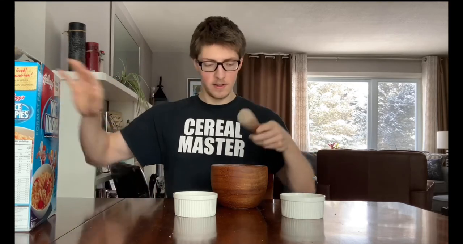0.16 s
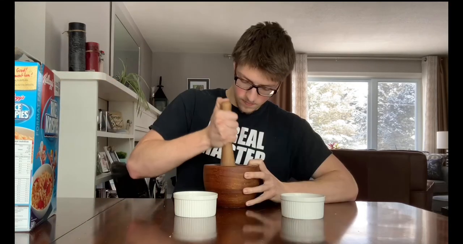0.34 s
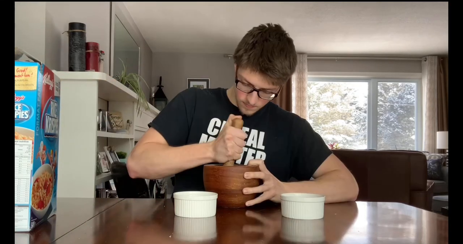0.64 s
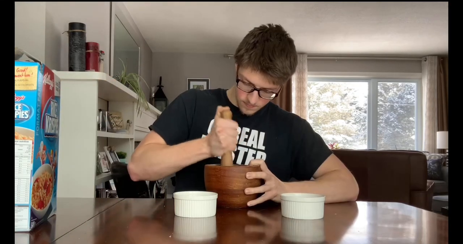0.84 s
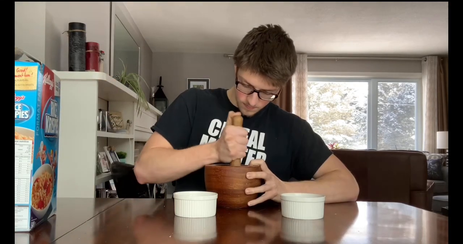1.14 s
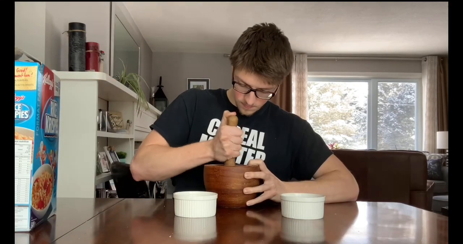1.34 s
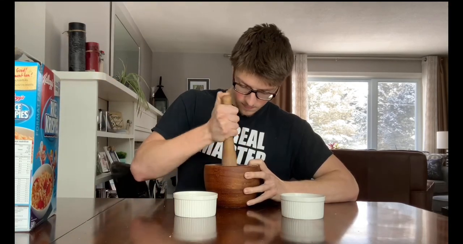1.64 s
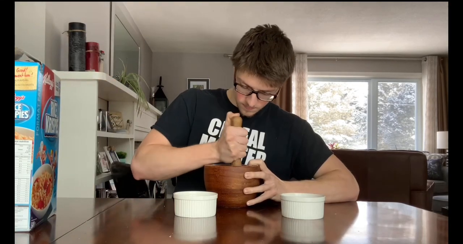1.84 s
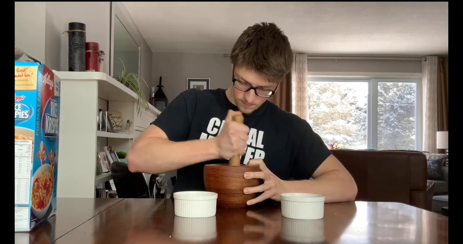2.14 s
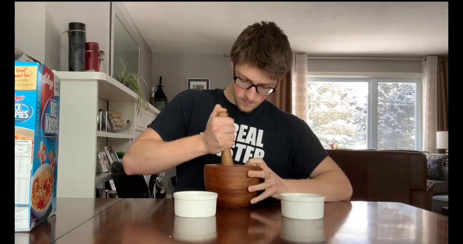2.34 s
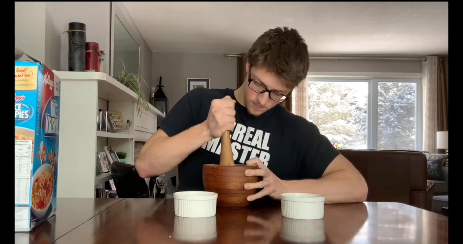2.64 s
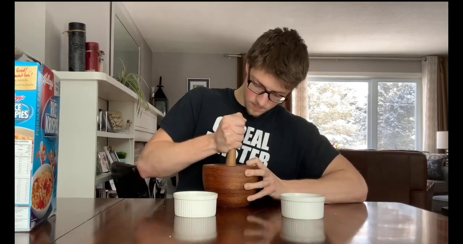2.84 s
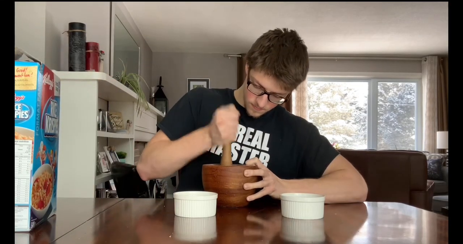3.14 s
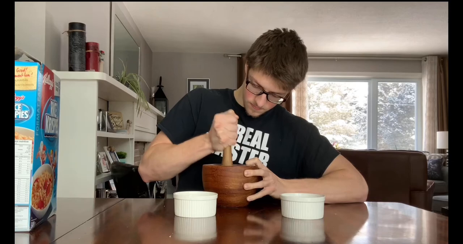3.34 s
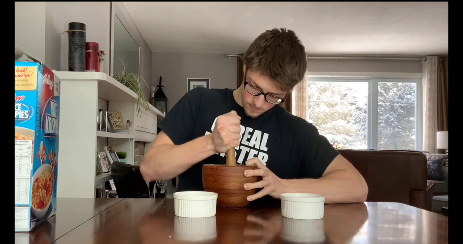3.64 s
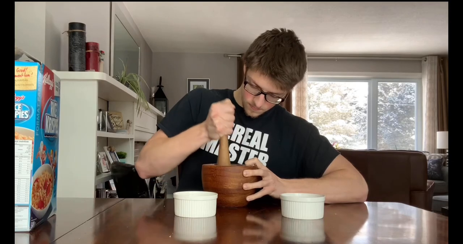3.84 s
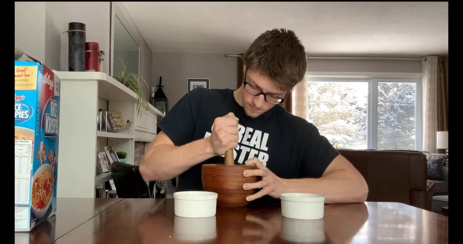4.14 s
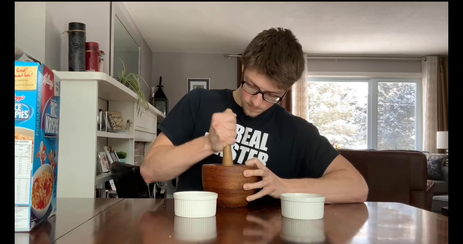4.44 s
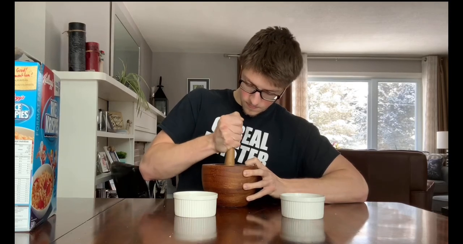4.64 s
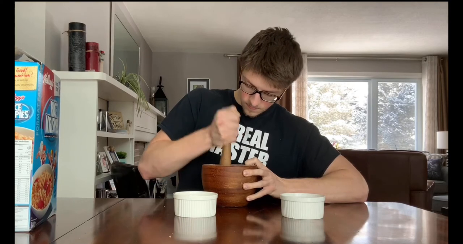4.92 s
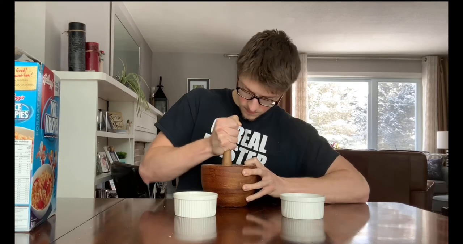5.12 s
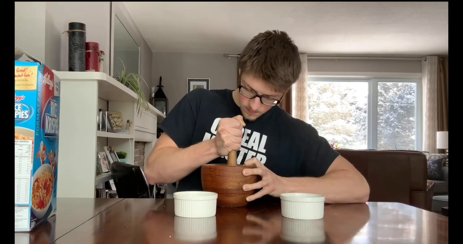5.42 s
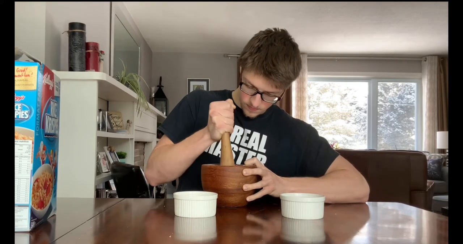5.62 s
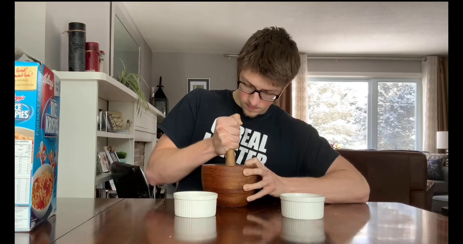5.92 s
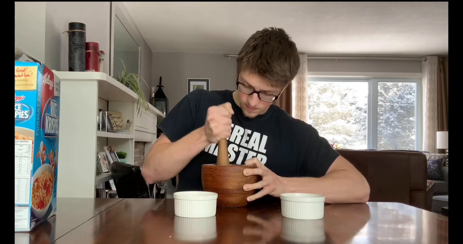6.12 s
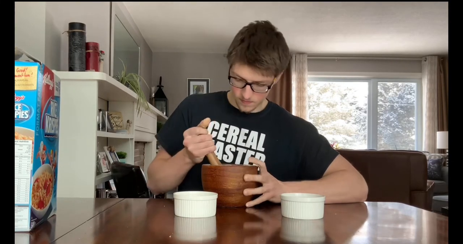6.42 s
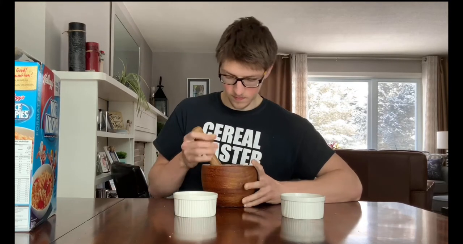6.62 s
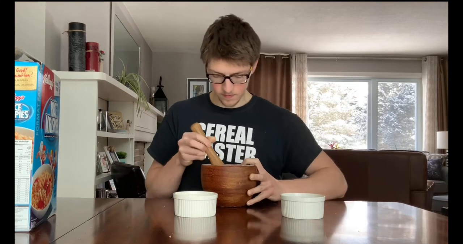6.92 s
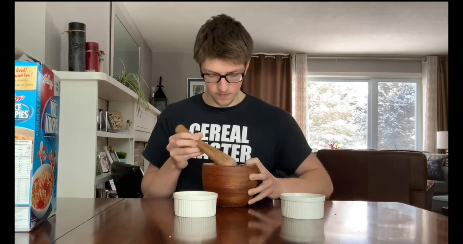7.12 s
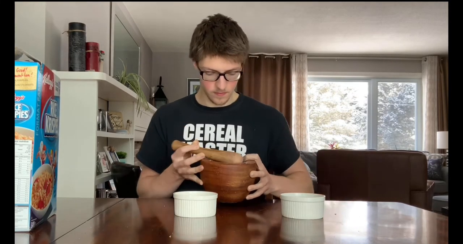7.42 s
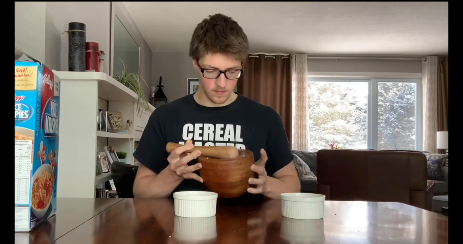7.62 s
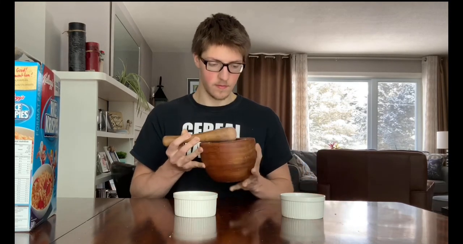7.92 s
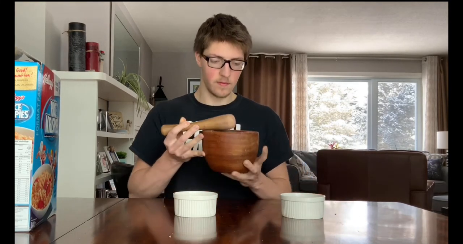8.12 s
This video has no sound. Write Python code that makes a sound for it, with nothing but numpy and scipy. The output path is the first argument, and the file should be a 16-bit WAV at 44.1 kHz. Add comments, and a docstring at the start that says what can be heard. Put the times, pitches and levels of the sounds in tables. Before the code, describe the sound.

A wooden pestle crunches dry cereal flakes in a wooden bowl in uneven pushes, then a few soft knocks as it is lifted.

```python
"""Grinding dry flakes in a wooden mortar

A wooden pestle grinds cereal flakes on a dining table in quick, uneven pushes and then is handled at rest.
Brittle fracture is shaped noise, denser under more force; stick-slip friction rumbles in bowl and table.
Knocks, cracks and light slides excite damped modes of the wood, in a living room with short echoes.
Low ventilation is coloured noise with a wavering hum; two spaced microphone ports hear it all.
"""
import sys
import numpy as np
from scipy import signal
from scipy.fft import rfft, irfft, next_fast_len
from scipy.io import wavfile

SR = 44100
rng = np.random.default_rng(int(sys.argv[2]) if len(sys.argv) > 2 else 0)


def inscribe(sig):
    """Save sig as 16-bit PCM at rate SR to the path in sys.argv[1].

    A 1-D sig is mono; a 2-D sig holds one channel per row.
    Samples are clipped to [-1, 1] before scaling.
    """
    pcm = np.round(np.clip(np.atleast_2d(sig).T, -1, 1) * 32767)
    wavfile.write(sys.argv[1], SR, pcm.astype(np.int16))


N = 364707
SIZE = next_fast_len(N + SR // 4, real=True)
TIME = np.arange(N) / SR  # s
FREQS = np.arange(SIZE // 2 + 1) * SR / SIZE  # Hz

TOP_HZ = 15650  # upper limit of the sound
SWEEP_ATTACK_S, SWEEP_SETTLE_DB_PER_S = 0.007, 288  # onset and end of sweeping and sliding
LEFT_RIGHT = np.array([[1], [-1]])

# modes of mortar and pestle: (frequency [Hz], relative level [dB], decay time to -60 dB [s])
WOOD_MODES = [(465, -11, 0.067), (561, -7.5, 0.085), (677, 2, 0.015), (884, 7, 0.0045), (1114, 5.5, 0.0041),
              (1420, -2, 0.018), (1520, -7, 0.04), (1703, -17, 0.049), (1900, -10.5, 0.015),
              (3514, 19, 0.046), (3790, 3.5, 0.041), (4490, 16, 0.025), (6160, 5, 0.015),
              (624, -20.5, 0.24)]
# low thrum of the loaded table: (frequency [Hz], relative level [dB])
THRUM_SPECTRUM = [(100, -2.5), (195, 0.5), (245, 9.5), (400, 5.5), (600, -12), (1200, -55), (3000, -65)]


def undb(db):
    """Level and amplitude are logarithmically related: decibels to gain, floored at -300 dB."""
    return np.exp(np.maximum(db, -300) * np.log(10) / 20)


def unit(x):
    """Normalization by the root mean square: scale to rms 1."""
    return x / np.sqrt(np.mean(x ** 2))


def across(points):
    """Interpolation on a logarithmic pitch axis: a (Hz, value) table over all frequencies."""
    hz, value = np.transpose(points)
    return np.interp(np.log(FREQS + 1), np.log(hz), value)


def shape(x, response):
    """Linear filtering: multiply the spectrum by a frequency response."""
    return irfft(rfft(x, SIZE) * response, SIZE)[..., :N]


def colour(x, points):
    """Spectral shaping that keeps the power of a white input."""
    return shape(x, unit(undb(across(points))))


def through(x, response):
    """Superposition: convolve with an impulse response."""
    return signal.oaconvolve(x, response)[:N]


def decay(t, t60):
    """Exponential damping: amplitude falls by 60 dB in t60 seconds."""
    return np.exp(-np.log(1000) * t / t60)


def ringing(modes):
    """Modal superposition: damped modes of alternating sign form an impulse response of energy 1."""
    t = TIME[:SR // 3]
    ring = 0
    for k, (hz, db, t60) in enumerate(modes):
        ring = ring + (-1) ** k * undb(db) * np.sin(2 * np.pi * hz * t) * decay(t, t60)
    return ring / np.sqrt(np.sum(ring ** 2))


def walk(rate):
    """Random modulation: normal draws, rate per second, joined by straight lines; spread near 1."""
    points = rng.standard_normal(N // 16)
    return np.interp(TIME * rate, np.arange(len(points)), points)


def fractures(per_second, spread_db, clump_db, clump_rate):
    """Random impulse process: tiny clicks of unequal size, swelling in clumps; rms 1."""
    chance = np.clip(per_second / SR, 0, 1)
    size = undb(spread_db * np.minimum(rng.exponential(size=N), 4))
    clicks = (rng.random(N) < chance) * size * rng.choice([-1, 1], N)
    even = clicks / np.sqrt(chance)  # density leaves the power unchanged
    return unit(even * undb(clump_db * walk(clump_rate)))


def since(moment):
    """Causality: seconds gone by since a moment, 0 before it."""
    return np.maximum(TIME - moment, 0)


def together(*gains):
    """Incoherent addition: the powers of unrelated sounds add."""
    return np.sqrt(sum(gain ** 2 for gain in gains))


def shifting_ring(x, modes, patchy_db, bend, rate):
    """Modal resonance with each pitch and level wandering alone; near the power of a white input."""
    out, energy = 0, 0
    for hz, db, t60 in modes:
        fall = np.log(1000) / (t60 * SR)
        swing = np.exp(2j * np.pi * np.cumsum(hz * (1 + bend * walk(rate))) / SR)
        envelope = signal.lfilter([1], [1, -np.exp(-fall)], x * np.conj(swing))
        ring = np.imag(swing * envelope)
        out = out + ring * undb(db + patchy_db * walk(rate))
        energy = energy + undb(db) ** 2 / (2 * 2 * fall)
    return out / np.sqrt(energy)


def table_tones(x, t60):
    """Modal resonance: the long, low ring of the table and the room around it."""
    # standing tones: (frequency [Hz], relative level [dB])
    standing_tones = [(230, -5), (280, 1), (350, 0), (469, 0), (539, -3), (594, -1), (697, -3), (736, 0),
                      (795, -3), (856, -2), (998, -7), (1050, -7)]
    return through(x, ringing([(hz, db, t60) for hz, db in standing_tones]))


def background():
    """Broadband flow noise with a frequency-modulated hum: ventilation over the hush of the house."""
    # ventilation: (frequency [Hz], relative level [dB])
    drone_spectrum = [(20, -33), (30, -1), (45, -16.5), (62, -12), (88, 1.5), (108, -4.5), (130, -1),
                      (160, -11), (200, -16.5), (300, -34.5), (600, -54.5)]
    # hush of the house: (frequency [Hz], relative level [dB])
    hush_spectrum = [(25, -51), (86, 7), (136, -6), (253, -28.5), (281, -21), (399, -22.5), (445, -20),
                     (567, -32), (970, -34), (1530, -36.5), (1800, -47.5), (3930, -66), (5800, -58),
                     (9550, -48), (15500, -79)]
    drone = undb(-42.5) * colour(rng.standard_normal(N), drone_spectrum)
    hum_hz = 93 + 2.69 * walk(7)
    hum = undb(-56.5 + 6.0 * walk(17.0)) * np.sin(2 * np.pi * np.cumsum(hum_hz) / SR)
    # side against middle: (frequency [Hz], level [dB])
    spread = undb(across([(80, -21), (200, -8.0), (500, -3.5), (3000, 2.5), (8000, -21)]))
    mid, side = colour(rng.standard_normal((2, N)), hush_spectrum)
    above_drone = FREQS ** 2 / (FREQS ** 2 + 130 ** 2)
    hush = shape(mid, above_drone) + shape(side, spread * above_drone) * LEFT_RIGHT
    return drone + hum + undb(-39) * hush


def sweeping():
    """Granular flow: strength of rustle and grit as loose flakes move, swell or thin, and settle."""
    # flakes swept between pushes or sliding as the bowl is handled: (start [s], length [s],
    # relative level reached [dB], swell on the way [dB], grit relative to rustle [dB])
    sweep_events = [(.005, 0.061, -68.5, -1.5, 7), (0.1, 0.21, -56, -7.5, -10),
                    (0.587, 0.15, -42.5, 6.5, -12), (0.804, 0.081, -61, 7, -18),
                    (1.374, 0.12, -40, 7, -12.5), (1.997, 0.12, -50.5, 8, -12),
                    (2.383, 0.031, -43, 0, -11.5), (2.449, 0.076, -39, 23.5, -16),
                    (2.803, 0.13, -52, 0, -30), (3.17, 0.18, -56, -9.5, -22), (3.591, 0.1, -35.5, 24, -11),
                    (3.713, 0.07, -42, 4, -14.5), (4.019, 0.095, -43.5, 1.5, -16),
                    (4.15, 0.099, -45, 9, -22.5), (4.521, 0.19, -58, 0, -26.5), (5.32, 0.13, -60, -2, -24),
                    (5.475, 0.096, -50.5, 7.5, -1), (6.143, 0.069, -47.5, 23, -11),
                    (6.28, 0.39, -74, 4, -1), (6.644, 0.094, -61.5, 7, -7), (6.998, 0.25, -78.5, 2, 5.5),
                    (7.649, 0.054, -56.5, 5, -20)]
    loose, gritty = np.zeros((2, N))
    for start, length, db, swell_db, grit_db in sweep_events:
        to_go = 1 - np.minimum(since(start) / length, 1)
        onset = np.minimum(since(start) / SWEEP_ATTACK_S, 1)
        settling_db = SWEEP_SETTLE_DB_PER_S * since(start + length)
        rustle = onset * undb(db - swell_db * to_go - settling_db)
        loose = loose + rustle
        gritty = gritty + rustle * undb(grit_db)
    return loose, gritty


def knocks():
    """Impact excitation: the contact place picks the modes, blunt contact dulls them, the table rings on."""
    # hand gripping the bowl (first row), then pestle against bowl: (time [s], relative level [dB], # favoured
    # pitch [Hz], reach to -6 dB [octaves], share of the decay time that the grip leaves [1], # relative share
    # passed to the table [dB])
    bowl_contacts = [(0.021, -44, 560, 1.3, 1.7, -4.5), (0.317, -29, 1380, 0.6, 0.9, -33),
                     (5.184, -39, 800, 0.82, 1.7, -17), (5.213, -35, 605, 0.74, 1.1, -31),
                     (5.463, -44, 1400, 0.31, 0.71, -18), (6.145, -46.5, 1450, 0.48, 0.45, -30),
                     (6.978, -37, 1500, 1.2, 0.52, -21), (7.025, -29.5, 910, 0.65, 0.79, -10),
                     (7.193, -41, 1030, 0.6, 0.18, -25)]
    out, jolts = np.zeros((2, N))
    for start, db, centre_hz, reach, free, table_db in bowl_contacts:
        answering = []
        for hz, mode_db, t60 in WOOD_MODES:
            off_centre = np.log2(hz / centre_hz) / reach
            answering.append((hz, mode_db - 6 * off_centre ** 2, t60 * free))
        ring = ringing(answering)
        first = int(start * SR)
        out[first:first + len(ring)] += undb(db + 10.5) * ring[:N - first] / np.abs(ring).max()
        jolts[first] += undb(db + table_db)
    contact_hz = 1850
    out = signal.sosfilt(signal.butter(6, contact_hz, fs=SR, output="sos"), out)
    return out + undb(29.5) * table_tones(jolts, t60=0.53) + undb(25) * colour(jolts, THRUM_SPECTRUM)


def crumbling():
    """Brittle collapse: a sudden force on flakes and bowl that relaxes exponentially."""
    # flakes giving way at once: (time [s], relative level [dB], time constant [s],
    # push on the bowl relative to that on the flakes [dB])
    collapses = [(0.104, -62.5, 0.0088, -30), (1.583, -54, 0.006, -9), (0.872, -48.5, 0.045, -1),
                 (1.252, -50, 0.0067, -4.5), (1.873, -46.5, 0.062, -6), (2.971, -62, 0.0062, -20),
                 (3.506, -32.5, 0.0058, 2), (4.411, -38, 0.017, -6.5), (4.728, -49, 0.0069, -1),
                 (4.972, -48, 0.01, -7), (5.184, -35, 0.0096, -0.5), (5.466, -37, 0.0058, -6),
                 (5.546, -51.5, 0.21, -5), (5.804, -41.5, 0.018, 0), (6.001, -46, 0.016, -32),
                 (6.033, -46, 0.0081, -1), (6.142, -39.5, 0.0047, -30), (6.536, -58, 0.007, -8)]
    on_flakes, on_bowl = np.zeros(N), np.zeros(N)
    for start, db, length, push_db in collapses:
        burst = undb(db) * (TIME >= start) * np.exp(-np.abs(TIME - start) / length)
        on_flakes = on_flakes + burst
        on_bowl = on_bowl + burst * undb(push_db)
    return on_flakes, on_bowl


def pushing():
    """Contact force: flakes crunch as the pestle sinks; it meets the wood, grinds on and lets go."""
    # pushes of the pestle: (start [s], bite [s], relative crunch [dB], grind [s], relative rub [dB],
    # relative crackle of the crumbs [dB], easing of the arm [dB/s], table load relative to rub [dB])
    pestle_pushes = [(0.329, 0.055, -28, 0.098, -29.5, -35, 31, -1),
                     (0.865, 0.085, -29.5, 0.041, -34.5, -31, 66, 5.5),
                     (1.03, 0.012, -50, 0.04, -33, -43.5, 40, 1.5),
                     (1.236, 0.015, -39, 0.065, -35, -38, 37, 3),
                     (1.568, 0.056, -27.5, 0.068, -33.5, -37, 41, 4.5),
                     (1.691, 0.034, -50, 0.14, -32, -40.5, 23, -7),
                     (2.111, 0.1, -36, 0.0064, -40.5, -42.5, 52, 7.5),
                     (2.524, 0.057, -28.5, 0.0065, -27, -35, 52, -3),
                     (2.653, 0.036, -47, 0.013, -40, -38, 50, 10),
                     (2.96, 0.045, -26.5, 0.071, -31, -35.5, 56, -1.5),
                     (3.336, 0.081, -27.5, 0.021, -33, -35, 14, 5.5),
                     (3.41, 0.054, -51, 0.028, -32, -36, 59, 4.5),
                     (3.776, 0.043, -26.5, 0.089, -27.5, -32.5, 37.5, -0.5),
                     (4.236, 0.046, -26.5, 0.12, -29.5, -35.5, 37, -1),
                     (4.722, 0.043, -27, 0.0055, -29.5, -37, 42, 3.5),
                     (4.8, 0.05, -33, 0.049, -28, -41, 24, -21),
                     (4.964, 0.0044, -55, 0.063, -27.5, -41.5, 31, -5.5),
                     (5.181, 0.011, -42, 0.03, -29.5, -44.5, 72.5, -24),
                     (5.545, 0.023, -34, 0.077, -28, -41.5, 3, 0),
                     (5.789, 0.0028, -53, 0.0097, -44.5, -61, 71.5, 12),
                     (6.045, 0.0096, -72, 0.29, -56.5, -61.5, 1, 14.5),
                     (6.347, 0.0032, -75, 0.014, -60.5, -85, 73, 24)]
    bite_power, rub_power, rub_lag_s = 1.23, 2.57, 0.0057
    crunch_fall, rub_release, crumb_release = 313.5, 171, 112  # dB/s
    crunch, crumbs, rub, load = np.zeros((4, N))
    for start, bite, crunch_db, grind, rub_db, crumbs_db, easing, weight_db in pestle_pushes:
        on_wood = start + bite + rub_lag_s
        sinking = np.minimum(since(start) / bite, 1) ** bite_power
        rise = np.minimum(since(start) / (bite + rub_lag_s), 1) ** rub_power
        pressing = rise * undb(-easing * np.minimum(since(on_wood), grind))
        released = since(on_wood + grind)
        friction = pressing * undb(rub_db - rub_release * released)
        crunch = crunch + sinking * undb(crunch_db - crunch_fall * since(start + bite))
        crumbs = crumbs + pressing * undb(crumbs_db - crumb_release * released)
        rub = rub + friction
        load = load + friction * undb(weight_db)
    return crunch, crumbs, rub, load


def chips():
    """Free vibration of small fragments: short pings of random size and pitch; rms 1."""
    per_second, middle_hz, spread_octaves, spread_db = 700, 8700, .42, 2.5
    decay_cycles = 9  # cycles in which the amplitude falls by a factor e
    out, t = np.zeros(N), TIME[:SR // 100]
    for _ in range(int(per_second * N / SR)):
        place = rng.random()
        pitch, size = rng.standard_normal(2)
        hz = middle_hz * 2 ** (spread_octaves * pitch)
        if hz >= TOP_HZ:
            continue
        first = int(place * (N - len(t)))
        ping = np.sin(2 * np.pi * hz * t) * np.exp(-hz * t / decay_cycles)
        out[first:first + len(t)] += undb(spread_db * size) * hz / middle_hz * ping
    return unit(out)


def spurts(x):
    """Independent band modulation: flakes of different sizes crackle in bands that flare and sink alone."""
    # centres of the overlapping bands: (frequency [Hz])
    band_centres = [5000, 8000, 11000, 14500]
    spectrum = rfft(x, SIZE)
    out = 0
    for pick in np.eye(len(band_centres)):
        band = irfft(spectrum * np.interp(FREQS, band_centres, pick), SIZE)[:N]
        out = out + band * undb(2 * walk(30))
    return out


def flakes(crunch, crumbs, rub, collapse, judder):
    """Brittle fracture: thin walls crackle, denser under force; coarse crumbs grate and ring bare wood."""
    # spectra of fine crackle, bright splinters and coarse grit: (frequency [Hz], relative level [dB])
    crackle_spectrum = [(1000, -11.5), (2800, -21), (5000, -16), (7000, -5.5), (8600, 0.5), (10500, -2.5),
                        (13000, -9), (15800, -13.5)]
    splinter_spectrum = [(4000, -36.5), (7500, -8), (10500, -2), (12500, -6.5), (14000, -11),
                         (15800, -11.5)]
    grit_spectrum = [(600, 1), (1500, 7.5), (2200, 2.5), (2900, 1.5), (3600, 2.5), (5200, -1), (7000, 1.5),
                     (10000, -1), (15000, -33)]
    # whole flakes splinter brightly and cushion the wood; they get fewer with time
    fresh = undb(7 - 1.84 * TIME)
    loose, loose_grit = sweeping()
    fine = undb(-2.0) * together(crunch, crumbs, loose) * judder + collapse
    # crumbs splinter less than whole flakes
    whole = together(crunch, undb(-7) * crumbs, loose) * judder + undb(-22) * collapse
    ground = together(undb(-9.5) * crunch, undb(-8) * crumbs, undb(-16) * rub)
    coarse = together(ground, loose_grit) * judder + undb(-7.5) * collapse
    density = 600 + 6000 * np.sqrt(fine / fine.max())  # clicks per second

    fine_clicks = fractures(density, spread_db=0.0, clump_db=2.5, clump_rate=600)
    crackle = undb(-1.3) * fine * fine_clicks
    bright_clicks = fractures(density, spread_db=3, clump_db=3.2, clump_rate=70)
    splinters = undb(-7) * whole * fresh * bright_clicks
    grit, on_wall = (coarse * fractures(.6 * density, spread_db=0.5, clump_db=1.0, clump_rate=140)
                     for _ in range(2))
    upper_modes = [mode for mode in WOOD_MODES if mode[0] > 1200]
    wall_ring = shifting_ring(on_wall / fresh ** 2, upper_modes, patchy_db=4.5, bend=.022, rate=22)
    breaking = colour(crackle, crackle_spectrum) + colour(splinters, splinter_spectrum)
    breaking = breaking + undb(-9.5) * fine * chips()
    return spurts(breaking) + colour(grit, grit_spectrum) + undb(-14) * wall_ring


def rubbing(rub, load, collapse, judder):
    """Stick-slip friction: slips on the wall shake the bowl, slips on the bottom the table under it."""
    # slips over the wood: (frequency [Hz], relative level [dB])
    scrape_spectrum = [(90, -7), (190, -2.5), (270, -7), (430, 0.5), (580, 4.5), (760, 6), (1050, 1),
                       (1250, -6.5), (1650, -6), (2150, -37.5), (3000, -41), (6000, -57)]
    on_wall, on_bottom = (fractures(1400, spread_db=1.8, clump_db=1.5, clump_rate=110)
                          for _ in range(2))
    grip, weight = (undb(-6) * force * judder + collapse for force in (rub, load))
    slips = grip * on_wall
    table_slips = together(grip, undb(-9) * weight) * on_bottom
    table = undb(-3) * table_tones(table_slips, t60=.24)
    thrum = undb(4.0) * shape(weight * on_wall, undb(across(THRUM_SPECTRUM)))
    body_modes = [mode for mode in WOOD_MODES if mode[0] < 2000]
    body = undb(-17.5) * through(slips, ringing(body_modes))
    return undb(-1.5) * colour(slips, scrape_spectrum) + body + table + thrum


def cracks():
    """Impulse excitation: hard crumbs crack at the wall and set the upper modes of the wood ringing."""
    # crumbs cracking between pestle and wall: (time [s], relative level [dB])
    crumb_cracks = [(5.463, -19), (6.004, -52), (6.143, -28), (6.239, -23), (6.537, -36)]
    # direct click: (frequency [Hz], relative level [dB])
    click_spectrum = [(400, 7), (1500, 9), (2600, -13), (4500, -1), (8000, 5), (15000, -8)]
    clicks = np.zeros(N)
    for start, db in crumb_cracks:
        clicks[int(start * SR)] += undb(db)
    upper_modes = [mode for mode in WOOD_MODES if mode[0] > 1200]
    return colour(clicks, click_spectrum) + undb(-6) * through(clicks, ringing(upper_modes))


def gliding(rows):
    """Light friction: strength of sliding contacts that catch, swell or thin, and let go."""
    strength = 0
    for start, length, db, change_db in rows:
        onset = np.minimum(since(start) / SWEEP_ATTACK_S, 1)
        change = change_db * np.minimum(since(start) / length, 1)
        settling_db = SWEEP_SETTLE_DB_PER_S * since(start + length)
        strength = strength + onset * undb(db + change - settling_db)
    return strength


def sliding():
    """Friction-driven resonance: the wall sings softly, and the bowl rasps as it is handled."""
    # pestle along bare wall and rim, or shifting on the bowl:
    # (start [s], length [s], relative level [dB], change on the way [dB])
    wall_slides = [(5.468, 0.071, -57, -1), (6.008, 0.04, -59, -6), (6.115, 0.1, -56.5, -6),
                   (6.535, 0.022, -56, -6), (7.2, 0.13, -62, -15), (7.8, 0.23, -61, -18)]
    # thin rasps as the bowl is tipped and lifted:
    # (start [s], length [s], relative level [dB], change on the way [dB])
    bowl_rasps = [(7.03, 0.068, -72, 8), (7.19, 0.074, -64, -3)]
    rasp_hz, rasp_width_hz = 8320, 430  # width at half amplitude
    catches = fractures(1100, spread_db=2.2, clump_db=2.5, clump_rate=70)
    wall_modes = [mode for mode in WOOD_MODES if 1450 < mode[0] < 1800]
    wall = shifting_ring(gliding(wall_slides) * catches, wall_modes, patchy_db=1.5, bend=.012, rate=14)
    resonance = 1 / (1 + (2 * (FREQS - rasp_hz) / rasp_width_hz) ** 2)
    rasp = shape(gliding(bowl_rasps) * catches, unit(resonance))
    return wall + rasp


def room(x, wet_db, t60_low, t60_high, width, count=4):
    """Reverberation: direct sound and a short tail that changes as pestle and arm circle."""
    # difference of the reflections between the ports: (frequency [Hz], level [dB])
    diffuse_levels = [(280, -15), (450, -3.5), (2100, -8.5), (2850, -10), (3900, 2)]
    circle_hz = 1.15  # turns of the pestle round the bowl
    t = TIME[:SR // 3]
    low_pass = signal.butter(2, 2500, fs=SR, output="sos")
    high_pass = signal.butter(2, 2500, "high", fs=SR, output="sos")
    mid, side = x, 0
    for k in range(count):
        noise = rng.standard_normal((2, len(t)))
        low = signal.sosfilt(low_pass, noise) * decay(t, t60_low)
        high = signal.sosfilt(high_pass, noise) * decay(t, t60_high)
        tail = (low - high) * np.clip(t / 0.0016, 0, 1) ** 2
        turn = (circle_hz * TIME * count - k + count / 2) % count - count / 2
        facing = np.cos(np.pi / 2 * np.clip(turn, -1, 1))  # each arm position hands over to the next
        alike, unlike = (undb(wet_db) * through(x * facing, r / np.sqrt(np.sum(r ** 2))) for r in tail)
        mid = mid + alike
        side = side + unlike
    return mid + width * shape(side, undb(across(diffuse_levels))) * LEFT_RIGHT


def scene():
    """Phase and level differences between spaced ports place the mortar and its room in stereo."""
    # lead of the left port: (frequency [Hz], phase [rad])
    port_phase = [(350, 0), (850, 1.0), (1450, 1.37), (2000, -1.27), (2550, -2.5), (3000, -3.5),
                  (3900, -5.4), (4600, -6.5), (7300, -5.5), (8300, -5.5)]
    # left minus right: (frequency [Hz], level [dB])
    port_balance = [(60, 1.5), (200, 3), (400, 4), (700, 5.5), (1300, 2.5), (2400, 0), (4400, -0.5),
                    (12000, -2.5)]
    crunch, crumbs, rub, load = pushing()
    on_flakes, on_bowl = crumbling()
    judder = undb(0.8 * walk(55))  # the pestle catches and jumps, for flakes and bowl alike
    breaking = flakes(crunch, crumbs, rub, on_flakes, judder)
    friction = rubbing(rub, load, on_bowl, judder)
    contacts = knocks() + sliding() + cracks()
    mortar = (room(breaking, wet_db=-7.5, t60_low=0.11, t60_high=0.15, width=.9, count=3)
              + room(friction, wet_db=-10, t60_low=0.33, t60_high=0.11, width=1.3, count=3)
              + room(contacts, wet_db=-9.5, t60_low=0.29, t60_high=0.053, width=.55, count=2))
    lead = np.array([np.exp(1j * across(port_phase)), np.ones(len(FREQS))])
    balance = undb(LEFT_RIGHT * across(port_balance) / 2)
    return shape(undb(-0.04) * shape(mortar, lead) + background(), balance)


def record(dry):
    """Band limitation: the highest treble is nearly mono; the deepest bass and the top are cut."""
    mid, side = (dry[0] + dry[1]) / 2, (dry[0] - dry[1]) / 2
    # gains: (frequency [Hz], level [dB])
    side = shape(side, undb(across([(7800, -0.5), (8800, -49.0), (14000, -71.0)])))
    low_cut = undb(across([(20, -29), (32, -22), (48, 0)]))
    top_cut = 1 / np.sqrt(1 + (FREQS / TOP_HZ) ** 400)
    return shape(np.array([mid + side, mid - side]), low_cut * top_cut)


dry = scene()
out = record(dry)
inscribe(out)
```